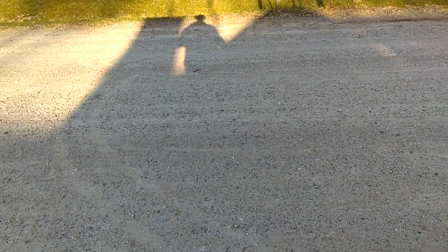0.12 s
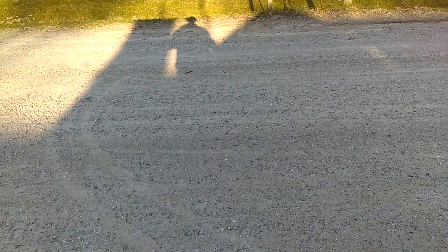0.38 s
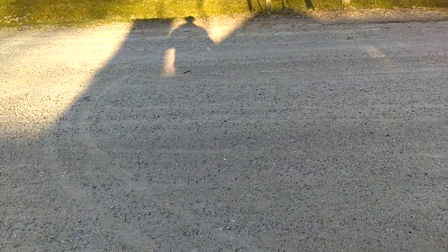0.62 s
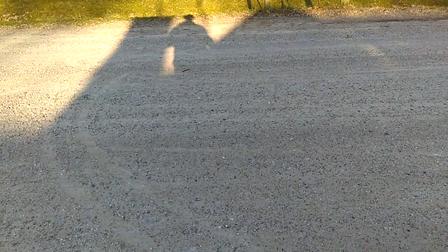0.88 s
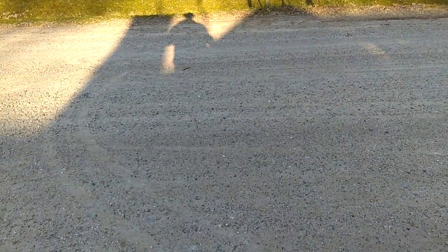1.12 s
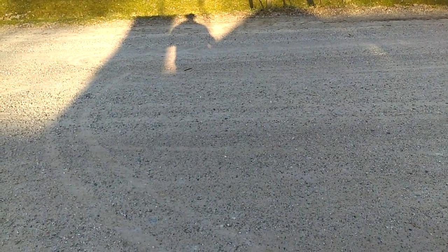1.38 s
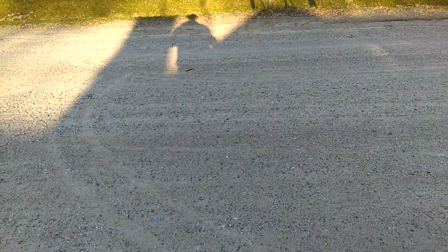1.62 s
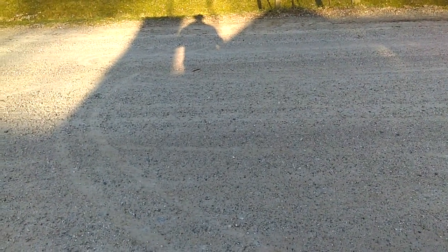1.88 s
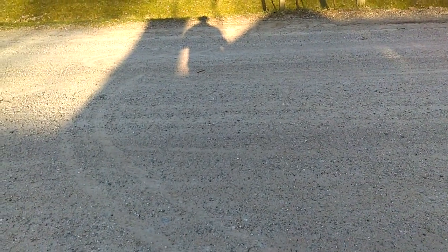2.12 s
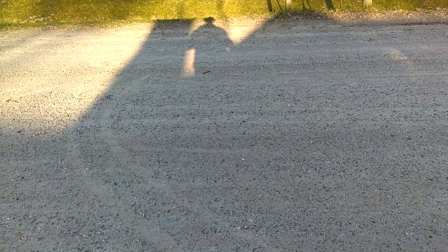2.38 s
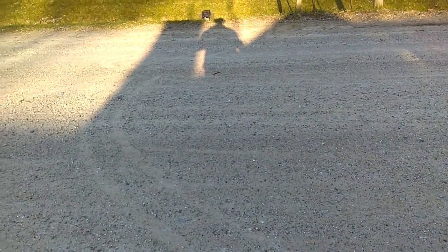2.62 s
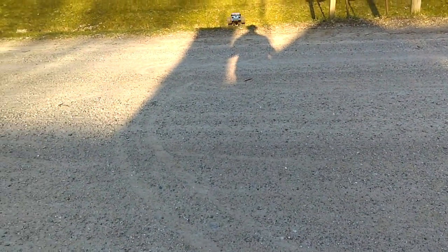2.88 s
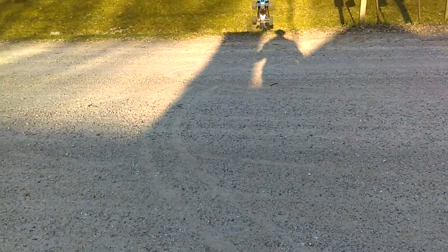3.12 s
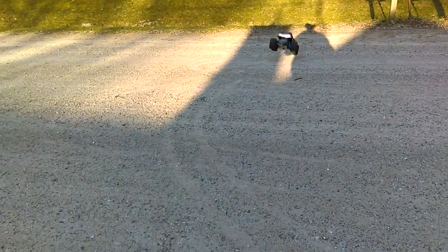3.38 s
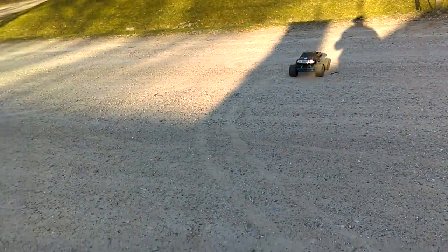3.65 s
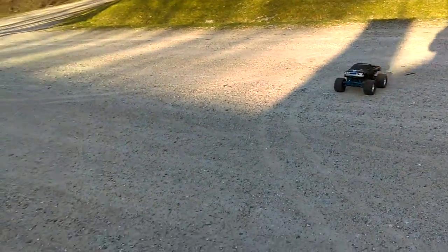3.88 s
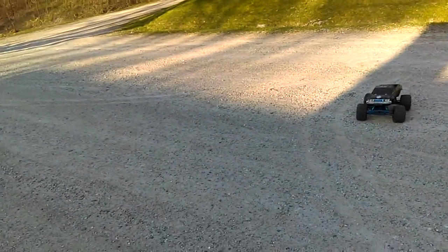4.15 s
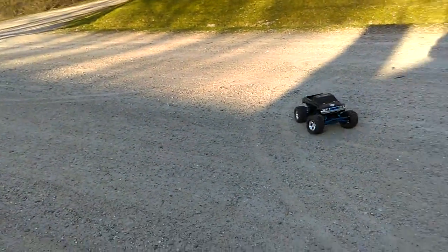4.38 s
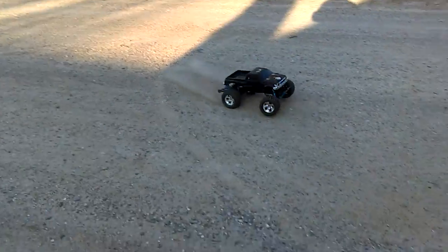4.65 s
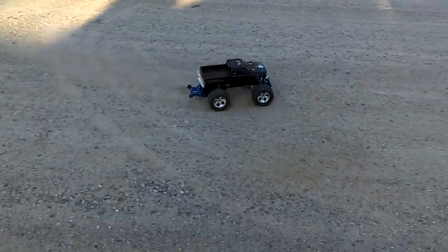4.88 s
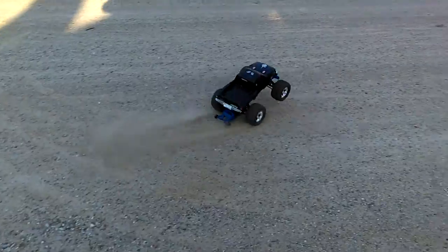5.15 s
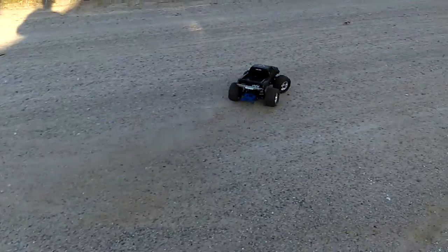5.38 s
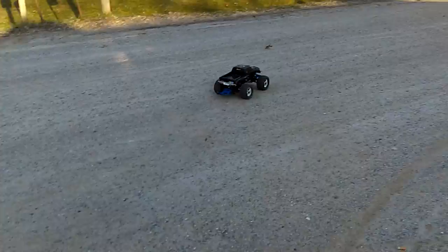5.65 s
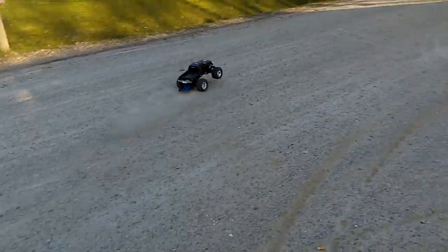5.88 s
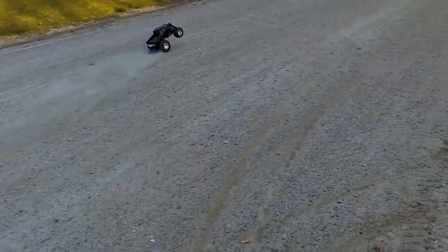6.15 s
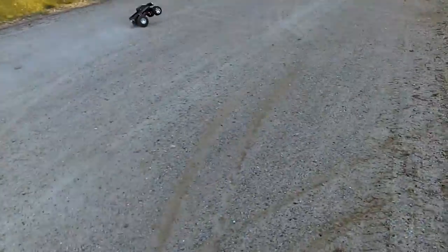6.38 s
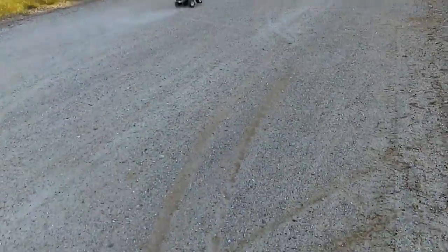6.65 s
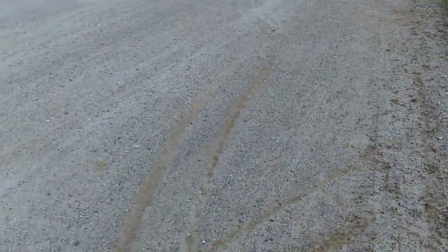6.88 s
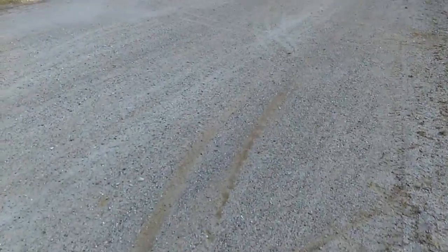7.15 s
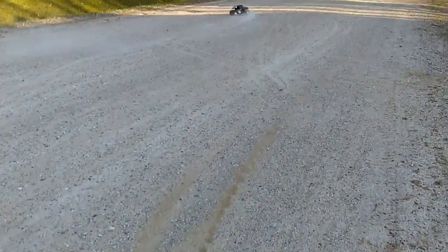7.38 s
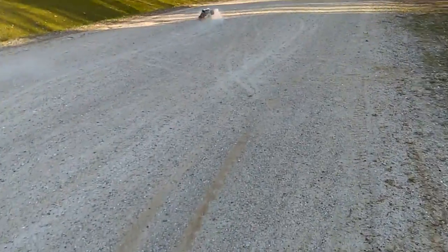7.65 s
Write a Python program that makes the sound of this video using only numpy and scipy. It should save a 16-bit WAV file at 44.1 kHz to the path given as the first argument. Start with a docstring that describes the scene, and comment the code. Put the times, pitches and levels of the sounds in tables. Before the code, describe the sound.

Outdoors on a gravel road, a faint, rough electric gear whine climbs in pitch as a toy truck approaches, flaring when wheels hop. It lands with sharp clacks and a thud, whistles thinly under braking, and turns close by with crunching tyres. Stuttering throttle bursts throw hissing grit as it speeds away. Wind buffets the handheld stereo microphone throughout, hardest near the turn, over faint far hiss.

```python
"""Small electric truck on a gravel road

It races up from afar, brakes, turns near the camera and speeds off again.
Two gear meshes whine with the motor as sums of rough tones; the speed controller whistles, mostly under braking.
Coloured grains of noise make the tyres' crunch, spray and chassis rumble; knocks ring, grit ticks, sand hisses.
Gusts buffet the two microphone ports, over a far hiss; the right port hears an echo from the camera body."""
import sys
import numpy as np
from scipy import signal
from scipy.fft import rfft, irfft, next_fast_len
from scipy.io import wavfile
from scipy.ndimage import uniform_filter1d

SR = 44100
rng = np.random.default_rng(int(sys.argv[2]) if len(sys.argv) > 2 else 0)


def materialize(psi):
    """Save the field psi as 16-bit PCM at rate SR to the path in sys.argv[1].

    A 1-D psi becomes a single channel; in a 2-D psi each row is a channel.
    """
    bounded = np.clip(np.atleast_2d(psi).T, -1, 1)
    quanta = np.round(bounded * 32767).astype(np.int16)
    wavfile.write(sys.argv[1], SR, quanta)


def ratio(d):
    """dB to gain"""
    e = np.asarray(d, float) / 20
    return 10 ** e


N = 342657


def evened(x):
    """Scales to rms 1."""
    return x / np.sqrt(np.mean(x ** 2) + 1e-20)


def read(points, hz):
    """Value of a spectrum table on a log frequency axis."""
    f, value = np.transpose(points)
    return np.interp(np.log(hz + 1), np.log(f + 1), value)


def curve(rows, **ends):
    """A table of (t, value) at every sample."""
    return np.interp(np.arange(N) / SR, *np.transpose(rows), **ends)


def played(rows):
    """The columns of a table at every sample of its span, and where it starts."""
    s, *columns = np.transpose(rows)
    t = np.arange(round(s[0] * SR), min(round(s[-1] * SR), N))
    return t[0], [np.interp(t / SR, s, c) for c in columns]


def held(rows):
    """The columns of a table that starts at 0 s, each keeping its last value to the end."""
    return [np.pad(c, (0, N - len(c)), "edge") for c in played(rows)[1]]


def coloured(x, gain):
    """Multiplies the spectrum by gain(Hz)."""
    size = next_fast_len(N + 4096)
    return irfft(rfft(x, size) * gain(np.fft.rfftfreq(size, 1 / SR)), size)[..., :N]


def wander(size, hz):
    """Random drift of rms 1 that changes about hz times a second."""
    return evened(signal.lfilter([1], [1, -np.exp(-2 * np.pi * hz / SR)], rng.standard_normal(size)))


def smooth(size, rate_hz):
    """Rounded random drift of rms about 1."""
    sos = signal.butter(2, rate_hz, fs=SR, output="sos")
    drift = evened(signal.sosfilt(sos, rng.standard_normal(size + 4000)))
    return drift[4000:]  # leaves out the start of the filter


def ramp(start, length, up_s, down_s):
    """0 to 1 and back: a linear rise, a hold to the end of the length, a linear fall."""
    end = start + max(length, up_s)
    return np.interp(np.arange(N) / SR, [start, start + up_s, end, end + down_s], [0, 1, 1, 0])


# right microphone port, deeper in the housing, whose echo makes a comb of peaks:
# f/Hz, lag/rad, gain over the left/dB
RIGHT_PORT = [(0, 0, 0), (340, -.2, 0), (690, 0, 5), (950, .6, 7), (1200, 1.1, 3), (1400, .9, 1),
              (1600, .7, 2), (1900, 1.4, 8), (2150, 2, 10), (2300, 2.8, 7), (2450, 3.2, 0), (2600, 3.7, 0),
              (2900, 6, 7), (3200, 7, 8), (3500, 8.2, 15), (3650, 8.9, 12), (3900, 9.7, 3), (4150, 9.9, 6),
              (4500, 11, 12), (4900, 13.6, 7), (5400, 15.6, 12), (5850, 17.8, 7), (6370, 18.9, 0),
              (6720, 19.6, 5), (7100, 20.9, 4), (7750, 23, 12), (8450, 25, 7), (9200, 27.5, 5),
              (9800, 29.5, 7), (10500, 31.6, 2), (13400, 41.2, 2), (16000, 50, 0)]


def ports(x):
    """A sound from the road reaches the left port first; the right one is later and mostly louder."""
    table_hz, lag_rad, gain_db = np.transpose(RIGHT_PORT)

    def right(hz):
        return ratio(np.interp(hz, table_hz, gain_db)) * np.exp(-1j * np.interp(hz, table_hz, lag_rad))
    return np.array([x[0], coloured(x[-1], right)])


def heard(pair, lo_hz, hi_hz):
    """Through the ports, with the mean of both at rms 1 in the band."""
    pair = ports(pair)
    return pair / np.std(coloured(pair.mean(0), lambda hz: (hz > lo_hz) & (hz < hi_hz)))


def tone(hz, db, rough, throb_db):
    """A whine, part clean and part fuzz from uneven teeth, that cuts in and out."""
    turns = np.cumsum(hz) / SR
    fuzz_hz = 0.04 * hz.mean()  # the fuzz is wider at a higher pitch
    fuzz = (smooth(len(hz), fuzz_hz) + 1j * smooth(len(hz), fuzz_hz)) / np.sqrt(2)
    rough = np.clip(rough, 0, 1)
    body = ((np.sqrt(1 - rough ** 2) + rough * fuzz) * np.exp(2j * np.pi * turns)).imag
    throb = throb_db * np.minimum(smooth(len(hz), 18), 1)
    fade = signal.windows.tukey(len(hz), min(1, 0.0056 * SR / len(hz)))
    return np.sqrt(2) * ratio(db + throb) * body * fade


# the climb from afar, then one table a run of the motor: pulls of the throttle, and at 3.15 s a slowing
# after the landing: t/s, slow mesh f/Hz before hops and slip, effort/dB
MOTOR_RUNS = [
    [(.56, 293, -62), (.65, 276, -73), (.8, 325.6, -64.5), (1.05, 400, -65), (1.11, 452, -67),
     (1.19, 437, -65), (1.33, 460, -65), (1.36, 495, -63), (1.5, 515, -60), (1.56, 512, -58),
     (1.85, 595, -56.5), (2.04, 648, -57), (2.2, 751, -54.5), (2.49, 847, -56), (2.6, 931, -64),
     (2.76, 1066, -64.5), (2.965, 1400, -36), (2.98, 1570, -35), (3.01, 1810, -31.5), (3.045, 1905, -32),
     (3.07, 2080, -27.5), (3.11, 2043, -36)],
    [(3.148, 1880, -49), (3.17, 1620, -39), (3.195, 1400, -55)],
    [(3.38, 591, -52), (3.41, 806, -42.5), (3.45, 1060, -52), (3.47, 1180, -61)],
    [(4.44, 639, -36), (4.5, 720, -38), (4.54, 840, -35), (4.585, 983, -32.5), (4.64, 1135, -26),
     (4.69, 1182, -31), (4.75, 1102, -41)],
    [(4.99, 661, -42), (5.04, 871, -31), (5.062, 984, -38.5), (5.1, 1300, -32.5), (5.14, 1375, -27.5),
     (5.2, 1370, -61)],
    [(5.44, 606, -61), (5.49, 789, -46), (5.54, 886, -30)],
    [(5.71, 725, -37), (5.74, 814, -42.5), (5.79, 1207, -37.5), (5.85, 1461, -37), (5.99, 1647, -45),
     (6.04, 1648, -40), (6.11, 1780, -44), (6.16, 1852, -39), (6.3, 1850, -41), (6.42, 1950, -40.5),
     (6.5, 1888, -40.5), (6.57, 1993, -40), (6.62, 1806, -41), (6.73, 1710, -51), (6.77, 1520, -45),
     (6.8, 1445, -43)],
    [(7.57, 792, -52), (7.6, 842, -51), (7.63, 1114, -48), (7.68, 1284, -54), (7.77, 1430, -55)],
]
# a wheel hops off a bump, races free and bites again: t of the bite/s, time in the air/s, gain in speed/share
HOPS = [(.74, 0.11, .36), (1.272, .06, 0.17), (1.441, 0.11, 0.31), (1.679, 0.15, 0.47), (1.981, 0.13, 0.52),
        (2.16, 0.13, 0.31), (2.344, 0.11, 0.32), (2.4, 0.028, .07), (2.441, 0.029, .12), (2.579, .09, 0.1),
        (2.72, .1, 0.38), (2.9, .12, 0.14)]
# fast mesh against the slow one: t/s, level/dB
PINION = [(.56, 11.5), (1.1, 4), (1.3, 4), (1.5, 3), (1.66, 4), (1.75, -34), (1.9, 2), (1.97, 10.5),
          (2.0, 11), (2.025, -18), (2.1, -1), (2.16, 3.5), (2.19, -16), (2.3, -2), (2.35, -9), (2.4, 10),
          (2.52, 15), (2.56, 4), (2.61, 11), (2.651, 1), (2.8, -38), (2.918, 12), (2.98, -5), (3.05, 3),
          (3.451, 2), (4.46, 16), (4.52, 23), (4.57, 9), (4.62, -13), (4.72, -8), (5.04, 15), (5.085, 3),
          (5.14, 14), (5.5, 3), (5.75, 5), (5.9, 11), (6.151, 7), (6.3, 0), (6.5, -1), (6.75, 10),
          (7.6, -23), (7.77, -14)]
# lowest tone of the slow mesh against its overtones: t/s, level/dB
LOWEST = [(.56, -8), (1.6, -8), (1.999, -9), (2.3, -7), (2.601, 5), (2.8, 15.5), (3.0, -12), (3.07, 0),
          (3.199, 5), (3.4, -13), (4.5, -1), (4.62, -2), (5.1, 5), (5.8, 8.5), (6.1, -11.5), (6.8, 2.5),
          (7.6, 10)]
# overtones of the two meshes: multiple of the mesh rate, level/dB, roughness (0-1), throb/dB
SLOW_ORDERS = [(1, -3, .3, 4), (2, -7, .5, 5), (1.5, -19, .8, 6), (1.75, -23, .8, 6), (2.5, -20, .8, 6),
               (3, -12, .8, 6), (4, -16, .8, 6), (4.75, -11, .7, 6), (5, -11, .7, 6), (5.5, -14, .7, 6)]
FAST_ORDERS = [(1, -6.5, .7, 4), (2, -24, .8, 4)]
# body shell as it passes the whine: f/Hz, gain/dB
SHELL = [(250, -33), (700, -8.5), (1000, -5), (1350, 2), (1900, -3), (2250, -2), (2550, -13), (3000, -3.5),
         (3450, 2.5), (3900, -4), (4400, -2.5), (5000, -11.5), (5700, -10.5), (6300, -4), (6800, -6.5),
         (8000, -10), (9200, -15), (15000, -17)]


def gears():
    """Two meshes whine at their tooth rates and multiples of these, shaped by the body shell."""
    fast_mesh = 3.68  # tooth rate of the motor pinion as a multiple of the slow mesh
    bite_s = 0.061
    out = np.zeros(N)
    racing = 1 + sum(share * ramp(s - air_s, air_s, air_s, bite_s) for s, air_s, share in HOPS)
    slip_hz = 11 * smooth(N, 24)  # the slow mesh drifts as tyres grip and slip
    pinion_db, lowest_db = curve(PINION), curve(LOWEST)
    for rows in MOTOR_RUNS:
        at, (hz, effort_db) = played(rows)
        span = slice(at, at + len(hz))
        hz = hz * racing[span] + slip_hz[span]
        meshes = ((hz, effort_db, SLOW_ORDERS),
                  (fast_mesh * hz, effort_db + pinion_db[span], FAST_ORDERS))
        for mesh_hz, mesh_db, orders in meshes:
            for k, db, rough, throb_db in orders:
                partial_hz = k * mesh_hz
                if k == 1 and orders is SLOW_ORDERS:
                    db = db + lowest_db[span]
                if k > 4:  # these come in only at high speed
                    db = db + np.interp(mesh_hz, [1150, 1600], [-20, 0])
                whine = tone(partial_hz, mesh_db + db + read(SHELL, partial_hz), rough, throb_db)
                out[span] += (partial_hz < SR / 2.2) * whine
    return ports(out[None])


# the controller's whistles, mostly under braking, with a short chirp at the last pull:
# t/s, length/s, level/dB, f/Hz, unsteadiness (1 = strong)
WHISTLES = [(3.186, 0.073, -38.5, 2990, 1.1), (3.327, 0.12, -38.5, 2940, 0.3),
            (3.877, 0.11, -54, 2970, 1.1), (3.998, 0.2, -43.5, 2833, 1.04), (4.12, 0.13, -43.5, 2890, 0.68),
            (4.254, 0.14, -45.5, 2830, 1.23), (4.409, 0.077, -36.5, 2890, 0.5),
            (7.589, 0.019, -40.5, 3060, 0.45)]


def controller_whistle():
    """The speed controller sings near its switching rate; each whistle swells and fades."""
    out = np.zeros(N)
    for start, length, db, hz, shaky in WHISTLES:
        part = out[round(start * SR):][:round(length * SR)]
        arch_db = db - 12 * np.linspace(-1, 1, len(part)) ** 2
        part += tone(np.full(len(part), float(hz)), arch_db, rough=.8 * shaky, throb_db=5 * shaky + 1)
    return ports(out[None])


# scattered part of the gravel noise: f/Hz, share unlike in the two ports
DIFFUSE = [(300, .3), (1000, .3), (2500, .3), (4000, .4), (6500, .5), (9500, .65), (11500, .85),
           (14000, .7)]


def grains(spectrum, per_s, spread_db, hush, lumps_db, lumps_hz):
    """Countless stone contacts of random size over a smooth bed, in clumps; part of it arrives scattered."""
    sizes = ratio(spread_db * np.minimum(rng.exponential(1, N), 4))
    sparse = (rng.random(N) < per_s / SR) * sizes
    contacts = evened(sparse * rng.standard_normal(N)) + hush * rng.standard_normal(N)

    def share(hz):
        return np.clip(read(DIFFUSE, hz), 0, 1)
    direct = coloured(evened(contacts), lambda hz: np.sqrt(1 - share(hz) ** 2))
    scattered = coloured(rng.standard_normal((2, N)), share)
    clumps = ratio(lumps_db * wander(N, lumps_hz))
    return coloured((direct + scattered) * clumps, lambda hz: ratio(read(spectrum, hz)))


def patchy(x, patchy_db):
    """Loose stones ring here and there: patches of the spectrum swell and sink."""
    z = signal.stft(x, nperseg=512, noverlap=384)[2]
    field = rng.standard_normal(z.shape[1:])
    for _ in range(2):  # smooth over 3 bins and 12 hops
        field = uniform_filter1d(uniform_filter1d(field, 3, 0), 12, 1)
    return signal.istft(z * ratio(patchy_db * evened(field)), nperseg=512, noverlap=384)[1][:, :N]


# rolling as the truck nears and leaves: t/s, crunch/dB, treble of the spray above the crunch/dB, rumble/dB
ROLL = [(0, -76.5, -1, -68), (.6, -77, -2.5, -75), (1.27, -67.5, -7, -68.5), (1.9, -56.5, -4, -69.5),
        (2.5, -55, -6, -61), (2.6, -54, -7.5, -50.5), (2.85, -56.5, -7, -50.5), (3.12, -44.5, -12.5, -52),
        (3.33, -52.5, -31, -55.5), (3.61, -56.5, -4.5, -49), (3.74, -47.5, -15, -43.5),
        (3.98, -54.5, -7, -48), (4.3, -50.5, -15.5, -42), (4.41, -45, -12.5, -45), (4.78, -42, -7.5, -33),
        (4.95, -40, -8.5, -36), (5.24, -34, -7.5, -30.5), (5.41, -43, -12, -39.5), (5.7, -42, -5.5, -41),
        (5.9, -39, -7, -34.5), (6.04, -42, -11.5, -36.5), (6.07, -42.5, -10, -41),
        (6.2, -44.5, -9.5, -43.5), (6.24, -41.5, -13, -39), (6.33, -45.5, -9.5, -43.5),
        (6.52, -46, -8, -44), (6.56, -47.5, -7, -41), (6.66, -42.5, -9.5, -36), (6.84, -51, -6.5, -43.5),
        (7.14, -51, -4.5, -41), (7.49, -56, -8, -45), (7.77, -58, -5.5, -47)]
# swells of the tyre noise, as wheels spin or skid:
# t/s, rise/s, length/s, gain of crunch/dB, of treble/dB, of rumble/dB
SWELLS = [(2.865, 0.11, 0.2, 4, 14, -1.5), (3.379, 0.023, 0.096, 8, 5.5, -1), (4.017, 0.05, 0.23, 5, 2, 2),
          (4.416, 0.061, .33, 10, 2, 7), (4.955, 0.13, 0.22, 9, 2, 8.5), (5.268, 0.037, 0.032, 8, -3, 7),
          (5.421, 0.018, 0.12, 8, 5.5, 6), (5.726, 0.021, 1.086, 3, 6.5, 4.5),
          (7.473, 0.12, 0.27, 8.5, 1, 4.5)]
# the truck lands and skids: t/s, length/s, gain of crunch/dB, of treble/dB, of rumble/dB
LANDINGS = [(0.521, 0.045, 25, -14, 19), (2.711, 0.061, 8, -12, 8.5), (3.151, 0.13, 13, 4.5, 8.5),
            (3.497, 0.082, 24.5, -5, 24.5)]


def roll_levels():
    """Levels in dB of crunch, treble and rumble; swells and landings raise or lower them."""
    fall_s, land_s = 0.017, 0.0088
    land_keep = 0.51  # share of the gain left at the end of the skid
    t = np.arange(N) / SR
    roll_s, *columns = np.transpose(ROLL)
    level = np.array([np.interp(t, roll_s, c) for c in columns])
    for start, rise_s, length, *gain_db in SWELLS:
        level += np.outer(gain_db, ramp(start, length, rise_s, fall_s))
    for start, length, *gain_db in LANDINGS:
        sag = 1 - (1 - land_keep) * (t - start) / length
        level += np.outer(gain_db, ramp(start, length, land_s, fall_s) * sag)
    return level


# colours of the gravel under the tyres, of the thrown spray and of the chassis: f/Hz, relative level/dB
CRUNCH = [(500, -20), (1000, -11), (1350, 17.5), (1750, 11), (2300, 20), (3100, 14), (3700, 7), (4400, 5),
          (5200, 0), (6500, -71)]
SPRAY = [(3500, 7.5), (4500, 16), (5000, 11.5), (5600, 12.5), (6400, 15.5), (8000, 9.5), (9500, 9),
         (10800, 7), (12000, -5), (15800, -41)]
RUMBLE = [(90, -21), (170, 3), (260, 6), (400, 5), (600, -1), (850, -7.5), (1200, -8.5), (1800, -39.5)]


def tyres():
    """Stone contacts crunch and spray and shake the chassis; rattle and buzz ride on them."""
    crunch_db, treble_db, rumble_db = roll_levels()
    crunch = grains(CRUNCH, per_s=2500, spread_db=2.5, hush=1.0, lumps_db=1.8, lumps_hz=25)
    spray = grains(SPRAY, per_s=2100, spread_db=5.5, hush=1.36, lumps_db=1.7, lumps_hz=30)
    rumble = grains(RUMBLE, per_s=600, spread_db=2, hush=1.0, lumps_db=2.2, lumps_hz=25)
    low = heard(patchy(crunch, patchy_db=2.5), 1800, 3800) + rattle()
    high = heard(patchy(spray, patchy_db=3.0), 5000, 11000) + buzz()
    chassis = heard(rumble, 350, 900)
    return ratio(crunch_db) * low + ratio(crunch_db + treble_db) * high + ratio(rumble_db) * chassis


# modes of the shell, shaken by stones and gears: f/Hz, width/Hz, level against the crunch/dB
RATTLE = [(1365, 150, -14.5), (2130, 190, -30), (2950, 25, -28.5), (3399, 205, -12), (4030, 470, -13),
          (5510, 294, -23), (6740, 410, -37), (9000, 300, -45)]


def rattle():
    """Each mode of the shell rings on noise in its own short bouts."""
    out = np.zeros(N)
    for mode_hz, width_hz, db in RATTLE:
        swell = np.minimum(coloured(wander(N, 2.2), lambda hz: hz < 40), 1.3)
        bouts = rng.standard_normal(N) * ratio(10 * swell)
        ring = coloured(bouts, lambda hz: 1 / (1 + ((hz - mode_hz) / width_hz * 2) ** 2))
        out += ratio(db) * evened(ring)
    return ports(out[None])


def resonate(x, hz, width_hz):
    """A resonance of gain 1 that follows the curve hz."""
    turn, r = np.exp(2j * np.pi * np.cumsum(hz) / SR), np.exp(-np.pi * width_hz / SR)
    return 2 * (turn * signal.lfilter([1 - r], [1, -r], x / turn)).real


# bright buzz of the gears, moving with speed and heading: t/s, centre f/Hz, level against the spray's treble/dB
BUZZ = [(0, 9100, -7), (1.7, 8900, -6), (2.1, 8500, -16), (2.6, 8430, 3.5), (3.0, 8120, 1),
        (3.25, 7200, 16), (3.4, 6800, 13), (3.9, 7250, -30), (4.4, 7400, -17), (4.7, 7870, -7),
        (5.2, 8100, -5), (5.5, 7660, -20), (5.9, 7640, -4.5), (6.15, 9000, 3), (6.4, 10150, 1),
        (6.75, 8700, -1.5), (7.1, 8600, -1), (7.45, 7420, -10), (7.77, 8560, 2)]
# narrow strands within it: offset from the centre/share, width/Hz
STRANDS = [(-.07, 90), (-.03, 70), (.01, 80), (.05, 70), (.09, 90)]


def buzz():
    """A broad moving band of noise with thin strands that waver and come and go inside it."""
    hz, db = held(BUZZ)
    band = rng.standard_normal(N)
    for _ in range(2):
        band = resonate(band, hz, width_hz=1100)

    def slow(rate_hz):
        return evened(coloured(wander(N, rate_hz), lambda f: f < 3 * rate_hz))
    strands = np.zeros(N)
    for offset, width_hz in STRANDS:
        strand_hz = hz * (1 + offset + 0.016 * slow(3.8))
        strand = resonate(rng.standard_normal(N), strand_hz, width_hz)
        strands += ratio(15.0 * slow(13.0)) * evened(strand)
    both = evened(band) + ratio(-1) * evened(strands)
    return ratio(db) * heard(both[None], 5000, 11000)


# single short knocks: stones that snap, and a low thud of the landing at 3.52 s: t/s, level/dB, ring f/Hz
KNOCKS = [(0.5221, -33.5, 2950), (0.5384, -37, 2360), (0.547, -45, 4400), (.557, -44, 2300),
          (1.72, -40.5, 8850), (1.732, -47, 9600), (2.605, -34.5, 3440), (2.6923, -49, 2116),
          (2.713, -48, 1212), (3.1377, -31, 5530), (3.154, -21.5, 2950), (3.162, -20.5, 6800),
          (3.5, -26, 2870), (3.5199, -20, 2860), (3.521, -18.5, 785), (3.853, -31, 2300),
          (3.938, -33, 2770), (4.4226, -28, 3280), (4.8547, -24.5, 2170), (5.6062, -36, 3600),
          (7.4649, -38, 2120)]


def knocks():
    """Each knock is a short ring on a sharp crack of noise."""
    t60_s, attack_s = 0.02, 0.000054
    out, t = np.zeros(N + 3000), np.arange(3000) / SR
    for (s, db, hz), crack in zip(KNOCKS, rng.standard_normal((len(KNOCKS), 3000))):
        knock = np.sin(2 * np.pi * hz * t) + 0.31 * crack
        out[round(s * SR):][:3000] += ratio(db - 60 * t / t60_s) * knock * np.minimum(t / attack_s, 1)
    return ports(coloured(out[None, :N], lambda hz: hz ** 2 / (hz ** 2 + 500 ** 2) / (1 + (hz / 11000) ** 4)))


# thrown grit on the road nearby: t/s, level/dB
GRIT = [(3.331, -39), (3.371, -39), (3.851, -33), (4.1256, -33), (6.883, -32.5), (6.971, -33), (7.019, -31),
        (7.064, -20), (7.0844, -40), (7.1172, -24.5), (7.137, -28), (7.208, -31.5), (7.405, -39)]


def grit():
    """Each tick is a bright puff of noise without a ring."""
    t60_s, attack_s = 0.013, 0.00029
    low_hz, top_hz = 4800, 13500
    out, t = np.zeros(N + 2000), np.arange(2000) / SR
    for (s, db), crack in zip(GRIT, rng.standard_normal((len(GRIT), 2000))):
        out[round(s * SR):][:2000] += ratio(db - 60 * t / t60_s) * crack * np.minimum(t / attack_s, 1)
    return ports(coloured(out[None, :N], lambda hz: hz ** 2 / (hz ** 2 + low_hz ** 2) / (1 + (hz / top_hz) ** 6)))


# highest treble of the spray: t/s, level/dB
FIZZ = [(1.2, -88), (2.77, -72), (3.07, -55), (3.28, -75), (3.43, -82), (3.56, -53), (3.58, -68),
        (3.83, -72), (3.85, -64), (3.91, -75), (4.15, -70), (4.35, -75), (4.49, -57), (4.7, -54),
        (4.78, -61), (4.91, -64), (5.13, -46), (5.39, -59), (5.52, -50), (5.59, -67), (6.01, -50),
        (6.75, -56), (6.82, -67), (7.11, -59), (7.31, -65), (7.77, -67)]
# its colour: f/Hz, relative level/dB
FIZZ_COLOUR = [(9500, -27), (11000, 4.5), (12500, -2.5), (14000, -4), (14800, -14), (15800, -40)]


def fizz():
    """Fine sand hisses off the tyres at the top of the spectrum."""
    level_db = curve(FIZZ, left=-95)
    sand = grains(FIZZ_COLOUR, per_s=2500, spread_db=4.5, hush=1.2, lumps_db=1.5, lumps_hz=30)
    return ratio(level_db) * heard(patchy(sand, patchy_db=4), 11000, 15000)


# single strong eddies that thump a port: t of the start/s, mean peak of the ports/dB, f/Hz, left minus right/dB
THUMPS = [(0.483, -31, 83.4, 19), (0.592, -30, 100, 26.0), (0.726, -21.5, 79.4, 34), (0.869, -26, 89, 21.0),
          (1.239, -30, 80, -26.5), (1.428, -29, 88.8, -27.0), (1.503, -33, 91.5, -12.0),
          (1.555, -46, 94.2, -23.0), (1.713, -32, 71, 14), (1.954, -25, 150, 23), (2.028, -27, 93, 26.0),
          (2.084, -24.5, 91.7, 26.5), (2.207, -26, 122, 17), (2.54, -26.5, 72.3, 17),
          (2.799, -28, 86.1, 22), (2.925, -34, 80, -20.5), (3.108, -23.5, 125.8, -35),
          (3.909, -24, 87, -25), (4.499, -27, 213, -1.0), (4.957, -12.5, 142, -32), (5.083, -12, 253, -6),
          (5.717, -15, 223, 21), (5.745, -13.5, 110, 16.5), (6.24, -21, 156, 14), (6.554, -52, 291, 3),
          (7.307, -26.5, 90, 13)]


def thumps():
    """Each is one low swing of pressure, mostly on one port."""
    width = 0.544  # of the bell-shaped envelope, in cycles
    out = np.zeros((2, N + 4000))
    for s, db, hz, pan_db in THUMPS:
        cycles = np.arange(4000) / SR * hz - 2 * width
        swing = np.exp(-(cycles / width) ** 2) * np.cos(2 * np.pi * cycles)
        share = ratio(np.array([[pan_db], [-pan_db]]) / 2)
        out[:, round(s * SR):][:, :4000] += 2 * ratio(db) * share / share.sum() * swing
    return out[:, :N]


# wind on the microphone ports: t/s, level/dB, left minus right/dB
GUSTS = [(0.0, -45, -33), (0.11, -42, 10), (0.19, -44.5, -11), (0.58, -41.5, 25), (1.04, -37, 12),
         (1.06, -51, 11), (1.25, -35, -29), (1.51, -36.5, -8), (1.64, -37.5, -38), (1.71, -36.5, 8),
         (1.9, -38.5, 3), (2.08, -36, 22), (2.32, -36, 1.5), (2.57, -42.5, 20), (2.7, -40.5, -1),
         (2.83, -46.5, 19), (2.94, -38.5, -26), (3.46, -29.5, -49), (3.51, -30, -17), (3.79, -27, -48),
         (4.02, -53.5, 3), (4.28, -48, 14), (4.65, -47, -24), (4.93, -22, -30), (4.98, -19.5, -46),
         (5.02, -31, -10), (5.22, -20, 8), (5.32, -21.5, -4), (5.43, -22, 24), (5.56, -22, -6),
         (5.73, -29, 15), (6.34, -43.5, 9), (6.45, -55, -9), (7.27, -47, 4), (7.77, -59, -9)]
# colours of calm and of strong wind: f/Hz, relative level/dB
BUFFET = [(12, -49), (20, -20.5), (59, -2), (97, -3), (153, -8), (600, -51), (780, -73), (1320, -120)]
STRONG_BUFFET = [(12, -46), (20, -8), (55, 4), (100, 7), (217, 5), (400, -7.5), (600, -24), (1100, -96)]


def wind():
    """Eddies burst on each port by itself: low lumps in quick clumps, brighter in strong gusts."""
    calm_db, strong_db = -38, -25.5  # eddies get smaller and brighter between these levels
    level_db, pan_db = held(GUSTS)
    clumps = np.minimum([wander(N, 12), wander(N, 12)], 1.5)
    eddies = rng.standard_normal((2, N)) * ratio(5.2 * clumps)
    soft = evened(coloured(eddies, lambda hz: ratio(read(BUFFET, hz))))
    hard = evened(coloured(eddies, lambda hz: ratio(read(STRONG_BUFFET, hz))))
    strong = np.clip((level_db - calm_db) / (strong_db - calm_db), 0, 1)
    share = ratio(np.array([pan_db, -pan_db]) / 2)
    return 2 * ratio(level_db) * (soft + strong * (hard - soft)) * share / np.sqrt((share ** 2).sum(0))


# colour of the far hiss: f/Hz, relative level/dB
AIR = [(240, -33), (400, -8), (578, -19), (959, -4), (1050, -9), (1240, -0.5), (1470, -7), (1800, -32),
       (2600, -3.5), (2980, 5.5), (3870, -21), (10000, -20.5), (15600, -20)]


def air():
    """A faint far hiss of steady noise, partly shared by the two ports."""
    hiss = rng.standard_normal((2, N)) + 0.46 * rng.standard_normal(N)
    return ratio(-61.5) * evened(coloured(hiss, lambda hz: ratio(read(AIR, hz))))


def scene():
    """All sources at the two ports."""
    truck = gears() + controller_whistle() + tyres()
    road = knocks() + grit() + fizz()
    return truck + road + thumps() + wind() + air()


def band_limit(x):
    """A steep low-pass at the top of the band."""
    return signal.sosfilt(signal.butter(12, 15800, fs=SR, output="sos"), x)


def record(dry):
    """The finished mix of both ports, as the camera keeps it."""
    return band_limit(dry)


dry = scene()
out = record(dry)
materialize(out)
```